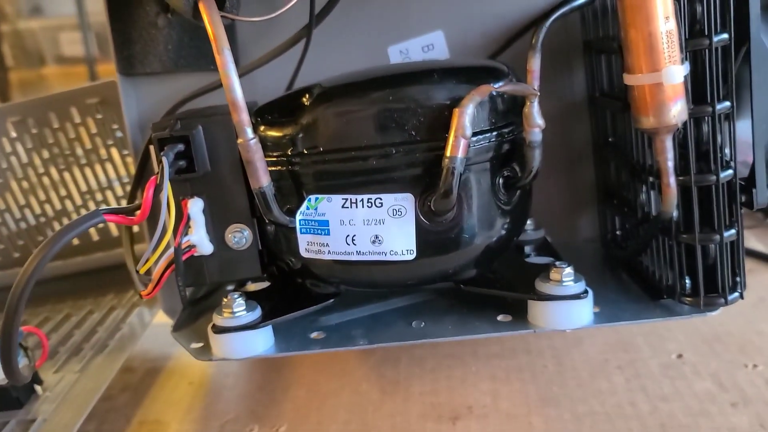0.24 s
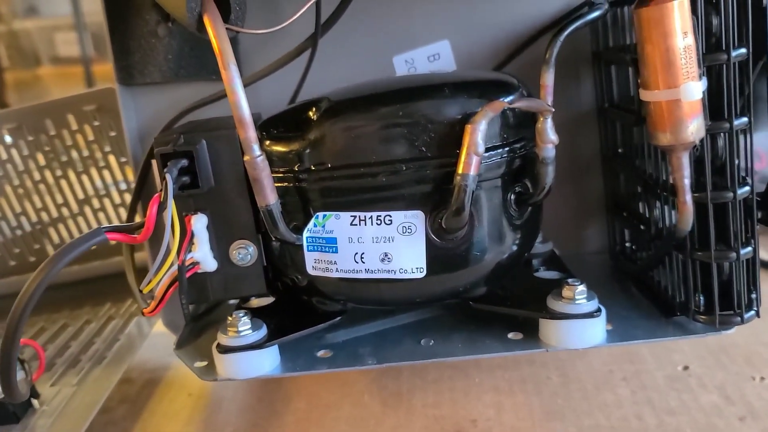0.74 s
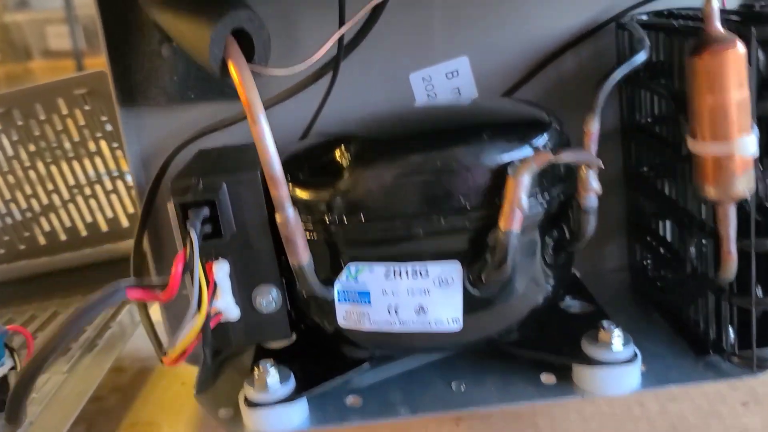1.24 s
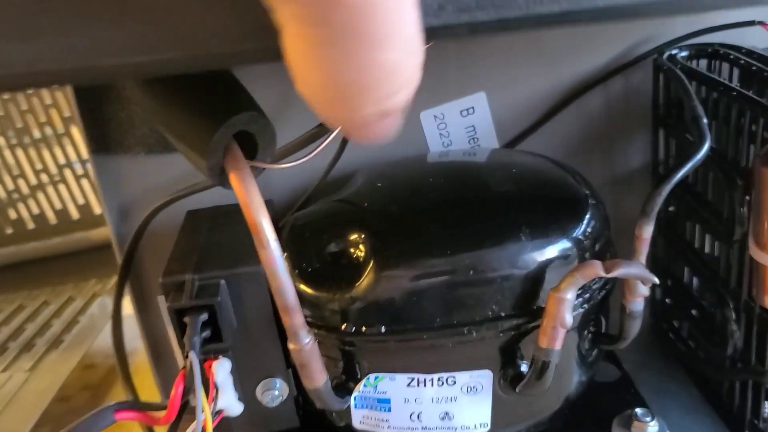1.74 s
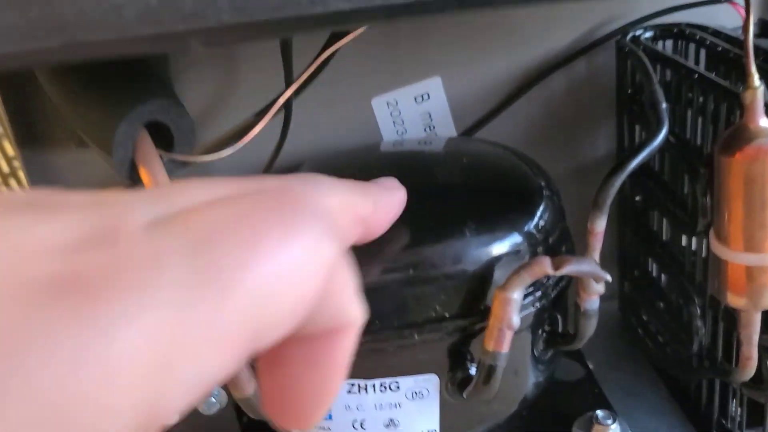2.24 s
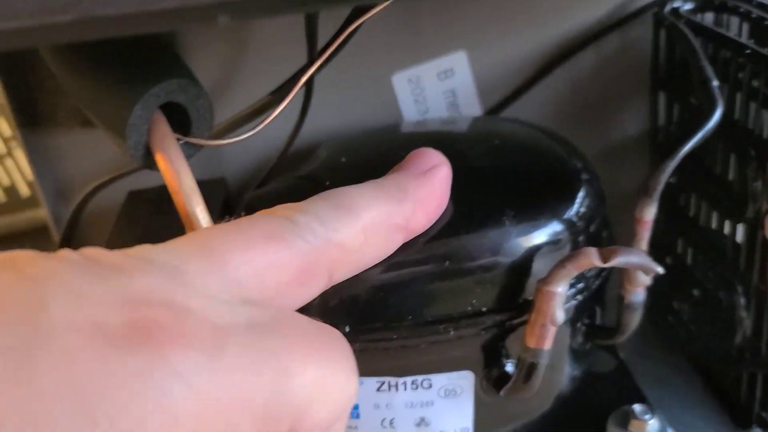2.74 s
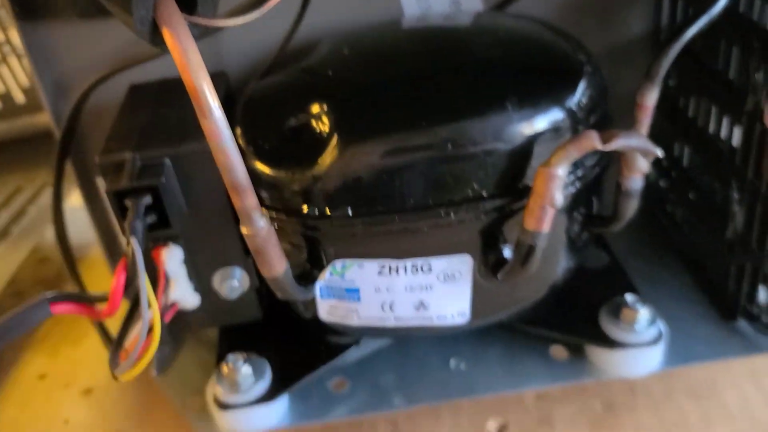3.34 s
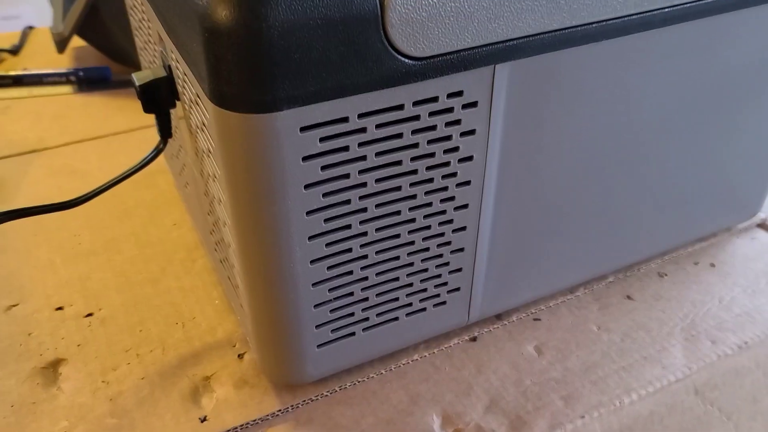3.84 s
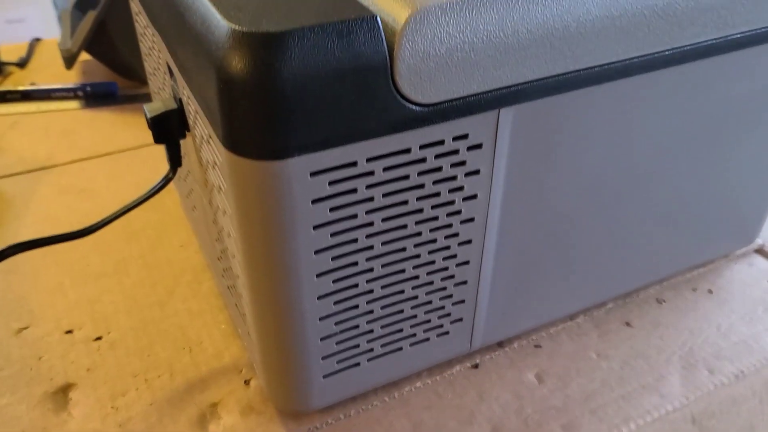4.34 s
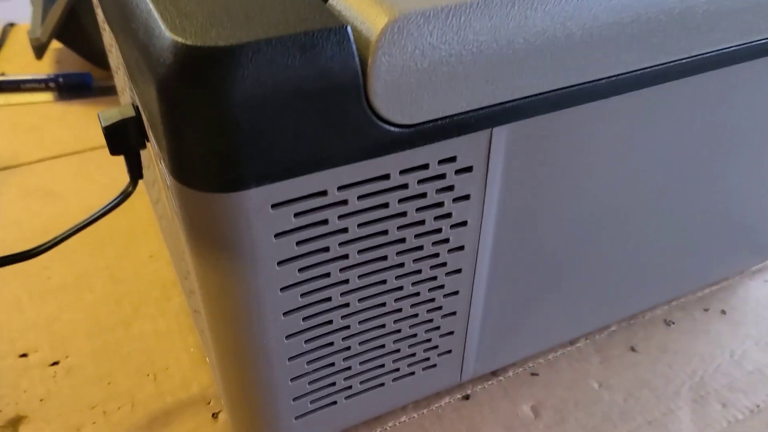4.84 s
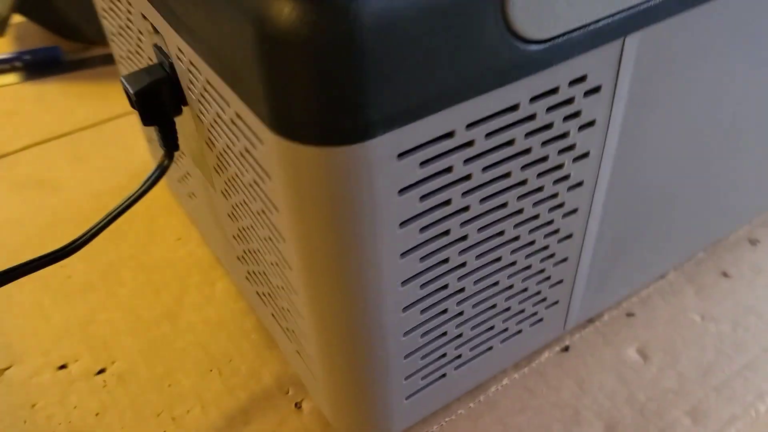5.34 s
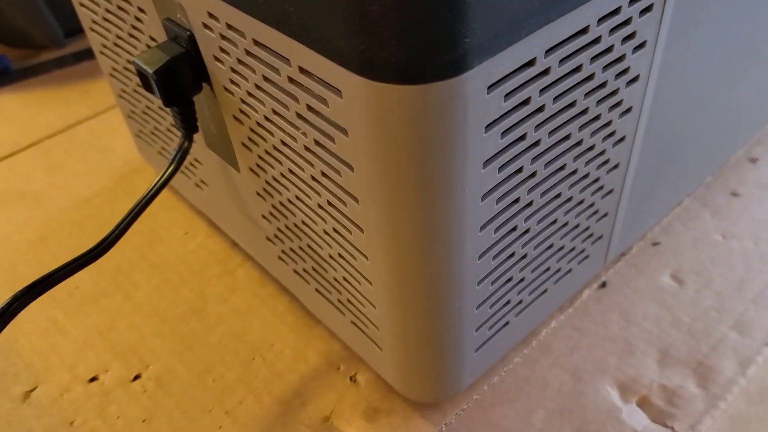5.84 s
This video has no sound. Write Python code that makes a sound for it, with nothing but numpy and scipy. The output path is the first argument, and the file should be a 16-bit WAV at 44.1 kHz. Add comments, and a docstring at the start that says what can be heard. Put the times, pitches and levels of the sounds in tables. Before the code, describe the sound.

A portable fridge compressor heard from close by: quiet uneven bumping grows into a quick rattle, a finger thumps the shell, and it steadies to a low buzzing hum with tiny chirps, pulsing gas hiss and faint high whine. A very short dropout follows, then a fuller, boomy drone from the closed case. Small rustles and clicks of handling come as the microphone nears the vents. No speech.

```python
"""A small piston compressor in a portable fridge, about 33 turns a second, heard from close by: motor
orders make its hum, modal impulses the rocking bumps until a finger knocks on the shell and steadies it.
After a brief dropout the same machine drones through the closed plastic case.
Valve reeds chirp as short sine bursts, the drive whines in sidebands, the gas is shaped noise puffed
once a turn, and handling is short swells of band noise."""
import sys
import numpy as np
from scipy import signal
from scipy.fft import rfft, irfft, next_fast_len
from scipy.io import wavfile
from scipy.ndimage import uniform_filter1d

SR = 44100
rng = np.random.default_rng(int(sys.argv[2]) if len(sys.argv) > 2 else 0)


def put_to_file(sound):
    """Save the sound as 16-bit audio at rate SR, in the file named by the first command-line argument."""
    columns = np.atleast_2d(sound).T  # one column per channel
    safe = np.clip(columns, -1, 1)
    whole_steps = np.round(safe * 32767)
    wavfile.write(sys.argv[1], SR, whole_steps.astype(np.int16))


N = 268833
TIME_S = np.arange(N) / SR
FFT_SIZE = next_fast_len(N, True)
BINS_HZ = np.fft.rfftfreq(FFT_SIZE, 1 / SR)

# Turning rate, and the time of one compression stroke
OPEN_TURNS_HZ, CLOSED_TURNS_HZ = 33.471, 33.543
OPEN_STROKE_S, CLOSED_STROKE_S = 2.8185, 4.3216
DROPOUT_FROM_S, DROPOUT_TO_S = 3.7165, 3.792

# Hum of the steadied shell. Each row: multiple of the turning rate, relative level in dB.
SHELL_HUM_ORDERS = [(1, -35.5), (2, -3.5), (3, -9), (4, -17.5), (5, 0.5), (6, -17), (7, -55), (8, -12.5),
                    (9, -26), (10, -25.5), (11, -25.5), (12, -31), (13, -28), (14, -36), (15, -30.5),
                    (16, -36.5), (17, -51), (18, -53)]
# Hum of the closed case. Each row: multiple of the turning rate, relative level in dB.
CASE_HUM_ORDERS = [(1, -47.5), (2, -2.5), (3, 0.5), (4, -26), (5, 3.5), (6, 2), (7, -8), (8, -14),
                   (9, -33.5), (10, -27), (11, -27), (12, -31.5), (13, -13.5), (14, -19), (15, -31),
                   (16, -54), (17, -46), (18, -37.5)]
# Motor whirr. Each row: multiple of the turning rate, relative level in dB.
WHIRR_ORDERS = [(19, -7), (21, -13.5), (22, -41.5), (23, 3), (24, -6.5), (25, -13.5)]
# Whine of the motor drive. Each row: sideband number, relative level in dB.
DRIVE_SIDEBANDS = [(-2, -10), (-1, -9), (0, 0), (1, -5.5), (2, -14)]
DRIVE_HZ = 10080
WHIRR_WAVER_DB, WHINE_WAVER_DB = 1.2, 1.8

# Modes of the shell on its mounts. Each row: frequency in Hz, relative level in dB, t60 in seconds,
# delay in seconds.
SHELL_MOUNT_MODES = [(83.4, -17, 0.22, 0.0112), (107.4, -5, 0.23, .014), (204.4, -1, 0.052, .003),
                     (260, -8.5, 0.037, 0.0013), (387.4, -12.5, 0.11, 0.006), (416, -13, 0.12, 0.0039),
                     (536, -28, 0.049, 0)]
# Last bump of the shaking shell, then the finger's blows. Each row: time in seconds, relative level in dB.
LANDING_BLOWS = [(1.7745, -27), (1.7905, -14.5), (1.8008, -14), (1.8112, -21)]
# Ring of the knock. Each row: frequency in Hz, relative level in dB, t60 in seconds, delay in seconds.
KNOCK_RING_MODES = [(54, -7, .2, .014), (192, -.5, .08, 0), (272, -8, .08, 0), (350, -8, .05, 0),
                    (554, -19, .03, 0)]
# Shell rebounding from the knock. Each row: time in seconds, relative level in dB, plate ring in dB.
SHELL_REBOUNDS = [(1.838, -22.5, -10), (1.895, -25, 2.5)]
# Bumps of one rock. Each row: seconds into the rock, relative level in dB, plate ring in dB.
BUMPS_PER_ROCK = [(0, 0, -2.5), (0.0614, -2, 3), (.0925, -8.5, 8.5)]
# The free shell rocks once in five turns; just before the finger lands it bumps on every stroke
ROCK_FROM_S, ROCK_S, SHAKE_FROM_S, SHAKE_TO_S = .0125, .1491, 1.564, 1.76
ROCK_DB, ROCK_GROWS_DB_PER_S, SHAKE_DB = -31.5, 4, -24.5
PLATE_FADES_DB_PER_S, SHAKE_PLATE_DB = -4, -2

# Gas and fan noise from further off. Each row: frequency in Hz, density in dB per Hz.
FAR_GAS_NOISE = [(25, -75.5), (110, -66.5), (220, -73.5), (420, -80.5), (620, -95.5), (800, -89),
                 (1050, -99), (1700, -105), (2400, -105), (3100, -96.5), (3700, -101), (4600, -98.5),
                 (11500, -103), (15500, -111)]
# Gas and fan noise near the shell. Each row: frequency in Hz, density in dB per Hz.
NEAR_GAS_NOISE = [(25, -66), (60, -82), (170, -61.5), (300, -73), (500, -80.5), (900, -84.5), (1300, -92.5),
                  (2300, -99.5), (4300, -93.5), (5500, -95.5), (10500, -96.5), (13000, -106), (15500, -109)]
# Gas and fan noise through the case. Each row: frequency in Hz, density in dB per Hz.
CASE_GAS_NOISE = [(25, -75.5), (100, -66.5), (200, -70), (300, -76), (450, -77.5), (700, -86.5),
                  (870, -95.5), (1050, -88.5), (2400, -95.5), (4600, -95.5), (5500, -101), (7300, -97.5),
                  (11500, -109), (15500, -111)]
# Handling rustle. Each row: peak time in seconds, rise in seconds, decay in seconds, level in dB,
# centre in Hz.
HAND_RUSTLES = [(1.345, 0.022, .013, -57.5, 4300), (1.9, 0.096, 0.15, -31.5, 48.3),
                (2.042, 0.0059, 0.02, -47.5, 2290), (2.106, 0.0093, 0.015, -43, 3770),
                (2.221, .003, .008, -48, 5000), (2.461, .003, .0066, -49.5, 5000),
                (3.11, .06, .044, -57.5, 4400), (3.68, 0.025, 0.016, -32.5, 50.4),
                (5.011, 0.012, 0.036, -45.5, 1660), (5.075, 0.021, .034, -57.5, 3780),
                (5.455, .022, 0.024, -52, 3340), (5.603, 0.0007, .004, -41.5, 5970),
                (5.738, 0.021, 0.02, -46.5, 4840), (5.86, 0.21, 0.066, -49.5, 4300),
                (6.08, .08, .082, -53, 3300)]
HISSY_RUSTLE_OCTAVES, DULL_RUSTLE_OCTAVES = 0.94, 0.67

# Listed hard valve chirps. Each row: time in seconds, relative level in dB.
LISTED_CHIRPS = [(0.489, -49), (0.638, -45.5), (0.787, -45.5), (1.6973, -38), (1.8444, -33), (2.0877, -36),
                 (2.1492, -37), (2.5676, -34), (2.7167, -37.5), (3.703, -29.5), (5.6122, -36)]
# Crank angles at which the two reeds open, and the chance that one flutters hard
REED_ANGLES_TURNS, HARD_CHANCE, HARD_FROM_S = (.62, .08), .42, 1.3
HARD_CHIRP_DB = (-55, -34)  # from afar, from close by
HARD_UNEVEN_DB, HARD_SCATTER_TURNS, SECOND_REED_DB = 1.5, .045, -1

# Microphone moving in on the bare shell. Each row: time in seconds, nearness 0 to 1.
SHELL_APPROACH = [(0, 0), (1.3, 0.16), (1.55, 0.5), (1.75, 0.72), (2.05, 0.92), (2.6, 0.88), (3.7, 0.98)]
# Microphone moving towards the vents of the closed case. Each row: time in seconds, nearness 0 to 1.
VENT_APPROACH = [(4.85, 0.1), (5.25, 0.56), (5.8, 1), (6.1, 0.7)]
# Uneven level of the open drive's whine. Each row: time in seconds, relative level in dB.
OPEN_WHINE_LEVEL = [(0.0, -69), (0.18, -73.5), (0.71, -67), (1.99, -65.5), (2.62, -69), (2.65, -77),
                    (2.83, -65), (3.08, -71.5), (3.7, -68)]
# Uneven level of the whine through the closed case. Each row: time in seconds, relative level in dB.
CLOSED_WHINE_LEVEL = [(3.82, -77), (4.094, -85), (5.68, -78)]
# Level of each part: (dB from afar, dB from close by)
SHELL_HUM_DB, SHELL_WHIRR_DB = (-60.5, -18), (-59.8, -53.3)
SHELL_VALVES_DB, SHELL_HISS_DB = (-70.5, -51.5), (-1, 0.5)
CASE_HUM_DB, CASE_WHIRR_DB = (-32, -30.5), (-62, -52)
CASE_VALVES_DB, CASE_HISS_DB, VENT_HUM_DB = (-59.5, -57), (0.1, 2), (-68, -45.5)
# Ceiling of the shell hum, and its brief dip after the knock
HELD_HUM_DB = -27.5
UPSET_AT_S, UPSET_S, UPSET_DB = 1.89, 0.054, -10

# Stereo width of diffuse noise. Each row: frequency in Hz, side minus mid in dB.
STEREO_WIDTH = [(60, -42), (110, -23), (200, -14), (380, -5), (700, -5), (1290, 0.5), (2380, 2),
                (4400, 1.5), (8120, 1), (15000, 0)]
# Stereo balance of diffuse noise. Each row: frequency in Hz, left minus right in dB.
STEREO_LEAN = [(60, 1.5), (110, -0.5), (200, 0.5), (380, 2), (700, 1.0), (1290, -0.5), (2380, -5.5),
               (4400, -4), (8120, 6), (15000, -3)]
# Microphone response. Each row: frequency in Hz, gain in dB.
MIC_RESPONSE = [(20, 1), (7600, 0.5), (7950, -9), (8900, -8), (10200, 2), (16000, -0.5)]
CUTOFF_HZ = 15800


def from_db(db):
    """Decibels to gain."""
    return 10 ** (np.asarray(db) / 20)


def rms_one(x):
    """Scale to unit power."""
    return x / np.sqrt(np.mean(x ** 2) + 1e-20)


def in_time(rows):
    """Join (s, value) rows by straight lines."""
    s, values = np.transpose(rows)
    return np.interp(TIME_S, s, values)


def gain_at(points, hz):
    """Gain of a (Hz, dB) table on a log-frequency axis."""
    f, db = np.transpose(points)
    return from_db(np.interp(np.log(np.maximum(hz, 1)), np.log(f), db))


def colour(x, gain):
    """Filter by a gain per frequency."""
    return irfft(rfft(x, FFT_SIZE) * gain, FFT_SIZE)[..., :N]


def resonance(hz, width_hz):
    """Complex gain per frequency of one resonance."""
    return 1 / (1 + 2j * (BINS_HZ - hz) / width_hz)


def drift(rate_hz):
    """Low-passed noise of unit power."""
    return rms_one(colour(rng.standard_normal(N), 1 / (1 + (BINS_HZ / rate_hz) ** 2)))


def white():
    """Mid and side noise of unit power per Hz."""
    return rng.standard_normal((2, N)) * np.sqrt(SR / 2)


def noise_band(noise, hz, octaves):
    """A bell-shaped band of noise; unit power."""
    distance = np.log2((BINS_HZ + 1) / hz) / octaves
    return rms_one(colour(noise, np.exp(-.5 * distance ** 2)))


def swell(s, rise_s, decay_s):
    """A rounded rise to a peak, then a dying tail."""
    before = np.minimum(TIME_S - s, 0) / rise_s
    after = np.maximum(TIME_S - s, 0) / decay_s
    return np.exp(-before ** 2 - np.minimum(after, 20))


def spread(mid, side):
    """Two microphones: alike in the bass, unrelated in the treble."""
    side = colour(side, gain_at(STEREO_WIDTH, BINS_HZ))
    half_lean = np.array([[.5], [-.5]])
    return colour(np.array([mid + side, mid - side]), gain_at(STEREO_LEAN, BINS_HZ) ** half_lean)


def place(x, pan_db, lag_ms):
    """A compact source: left louder by pan_db, right later by lag_ms."""
    left = np.interp(TIME_S + lag_ms / 1000, TIME_S, x)
    return np.array([left * from_db(pan_db / 2), x * from_db(-pan_db / 2)])


def nearness(path):
    """How close the microphone is, 0 to 1."""
    return np.clip(in_time(path), 0, 1)


def heard_at(near, levels_db):
    """Level of a part between its far and its close value."""
    far_db, close_db = levels_db
    return far_db + near * (close_db - far_db)


def crank(turns_hz, stroke_s, wander_turns):
    """Turns of the crank; whole numbers are compression strokes."""
    return turns_hz * (TIME_S - stroke_s) + wander_turns * drift(8.1)


def once_a_turn(turns, at, width):
    """A smooth bump at one crank angle."""
    return np.exp(-.5 * (((turns - at + .5) % 1 - .5) / width) ** 2)


def ring(clicks, hz, t60_s):
    """A unit click sets a decaying sine ringing through a two-pole resonator."""
    r = from_db(-60 / (t60_s * SR))
    w = 2 * np.pi * hz / SR
    return signal.lfilter([0, np.sin(w)], [1, -2 * r * np.cos(w), r * r], clicks + 1e-18)


def strike(times_s, levels_db, mode):
    """Blows ring one mode after that mode's delay."""
    hz, db, t60_s, delay_s = mode
    clicks = np.zeros(N)
    at = np.clip((times_s + delay_s) * SR, 0, N - 1).astype(int)
    clicks[at] = from_db(levels_db + db)
    return ring(clicks, hz, t60_s)


def low_pass(x, hz):
    """Second-order low-pass."""
    return signal.sosfilt(signal.butter(2, hz, fs=SR, output="sos"), x)


def rustles(grain_db):
    """Skin and cloth brush past and the hand shifts its grip: swells of grainy noise, hissy or dull."""
    out, noise = 0, rng.standard_normal((2, N))
    for s, rise_s, decay_s, db, hz in HAND_RUSTLES:
        octaves = HISSY_RUSTLE_OCTAVES if hz > 300 else DULL_RUSTLE_OCTAVES
        out = out + from_db(db) * swell(s, rise_s, decay_s) * noise_band(noise, hz, octaves)
    return out * from_db(grain_db * drift(251))


def slap(level_db, centre_hz, octaves, rise_s, decay_s):
    """The skin of the fingertip slaps the shell at the hardest blow: a swell of band noise."""
    s, _ = max(LANDING_BLOWS, key=lambda row: row[1])
    noise = noise_band(rng.standard_normal((2, N)), centre_hz, octaves)
    return from_db(level_db) * swell(s, rise_s, decay_s) * noise


def case_gas(turns):
    """Gas noise through the case: a steady flow and a puff at every stroke (mid, side)."""
    density = gain_at(CASE_GAS_NOISE, BINS_HZ)
    puff_tilt = gain_at([(250, 5.5), (500, 2.5), (1500, -0.5), (4600, 1.0), (7000, -2)], BINS_HZ)
    puff = colour(white() * once_a_turn(turns, at=0.033, width=0.068), density * puff_tilt)
    steady = colour(white(), density) * from_db(-2.5)
    return steady + puff


def shell_gas(turns, near):
    """Gas noise of the bare shell: far flow, and near flow with puffs (each mid, side)."""
    density = gain_at(NEAR_GAS_NOISE, BINS_HZ)
    # gas rushes out with every stroke, mostly in the middle of the range
    puff_tilt = gain_at([(250, -8), (500, 5.5), (1500, 9.5), (5000, 4.0), (10000, 0.0)], BINS_HZ)
    puff = colour(white() * once_a_turn(turns, at=0.049, width=0.082), density * puff_tilt)
    # the flow keeps the reeds' resonance sounding
    steady = colour(white(), density * (1 + 4.7 * resonance(3030, 240))) * from_db(-1.5)
    # the pipes ring faintly in the flow
    pipes = 1 + 2.0 * resonance(6350, 80) + 0.44 * resonance(4700, 340)
    far = colour(white(), gain_at(FAR_GAS_NOISE, BINS_HZ) * pipes)
    return far * np.sqrt(1 - near ** 2), near * (steady + puff)


def whine(turns):
    """The drive's switching tone, with sidebands from ten commutations a turn."""
    out = 0
    for k, db in DRIVE_SIDEBANDS:
        phase_turns = DRIVE_HZ * TIME_S + 10 * k * turns + rng.random()
        level = from_db(db + WHINE_WAVER_DB * drift(11.0))
        out = out + level * np.sqrt(2) * np.sin(2 * np.pi * phase_turns)
    return out


def whirr(turns):
    """High motor orders, each wavering a little; unit power."""
    out = 0
    for k, db in WHIRR_ORDERS:
        level = from_db(db + WHIRR_WAVER_DB * drift(9.2))
        out = out + level * np.sin(2 * np.pi * (k * turns + rng.random()))
    return rms_one(out)


def valves(turns, angles, reed_hz, length_turns, scatter_turns, uneven_db, second_db, rough):
    """Suction and discharge reeds each flutter briefly once a turn, never quite alike; unit power."""
    out = 0
    gas = rms_one(colour(rng.standard_normal(N), np.abs(resonance(reed_hz, 420)) ** 2))
    for angle, db in zip(angles, (0, second_db)):
        since = turns - angle + .5
        turn = (np.floor(since) - np.floor(since.min())).astype(int)
        chance = np.clip(rng.standard_normal((turn.max() + 1, 2)), -1.6, 1.6)
        late, size = chance[turn].T
        age_turns = since % 1 - .5 - scatter_turns * late
        flutter = np.sin(2 * np.pi * reed_hz * age_turns / OPEN_TURNS_HZ) + rough * gas
        envelope = np.exp(-.5 * (age_turns / length_turns) ** 2)
        out = out + from_db(db + uneven_db * size) * envelope * flutter
    return rms_one(out)


def chirp_rows(listed_db):
    """From 1.3 s until the dropout, some reed openings flutter hard and join the listed ones: (s, dB)."""
    first = -int(OPEN_STROKE_S * OPEN_TURNS_HZ)
    last = int((DROPOUT_FROM_S - OPEN_STROKE_S) * OPEN_TURNS_HZ)
    strokes = np.arange(first, last)
    angles = np.add.outer(strokes, REED_ANGLES_TURNS).ravel()
    late, size = rng.standard_normal((len(angles), 2)).T
    s = OPEN_STROKE_S + (angles + HARD_SCATTER_TURNS * late) / OPEN_TURNS_HZ
    near = np.interp(s, TIME_S, nearness(SHELL_APPROACH))
    db = heard_at(near, HARD_CHIRP_DB) + HARD_UNEVEN_DB * size
    db = db + np.tile([0, SECOND_REED_DB], len(strokes))
    hard = (rng.random(len(s)) < HARD_CHANCE) & (s > HARD_FROM_S)
    return [(at, level + listed_db) for at, level in LISTED_CHIRPS] + list(zip(s[hard], db[hard]))


def sharp_chirps(rows, reed_hz, length_s, rough):
    """A reed flutters much harder for a few milliseconds: a sine in a bell-shaped envelope."""
    out, age_s = np.zeros(N), np.arange(-400, 400) / SR
    half = len(age_s) // 2
    envelope = np.exp(-.5 * (age_s / length_s) ** 2)
    for (s, db), (detune, start) in zip(rows, rng.standard_normal((len(rows), 2))):
        at = int((s + length_s) * SR)
        hz = reed_hz * (1 + 0.012 * detune)
        out[at - half:at + half] += from_db(db) * envelope * np.sin(2 * np.pi * (hz * age_s + start))
    return out * (1 + rough * drift(400))


def bump_rows():
    """Bumps of each growing rock, then one every stroke, then the rebounds: (s, dB, plate dB)."""
    rocking = []
    for start in np.arange(ROCK_FROM_S, SHAKE_FROM_S, ROCK_S):
        for s, db, plate_db in BUMPS_PER_ROCK:
            if start + s < SHAKE_FROM_S:
                level_db = ROCK_DB + ROCK_GROWS_DB_PER_S * start + db
                rocking.append((start + s, level_db, plate_db + PLATE_FADES_DB_PER_S * start))
    shake_times = np.arange(SHAKE_FROM_S, SHAKE_TO_S, 1 / OPEN_TURNS_HZ)
    shaking = [(s, SHAKE_DB, SHAKE_PLATE_DB) for s in shake_times]
    return rocking + shaking + SHELL_REBOUNDS


def bumps(uneven_db, plate_share, level_db):
    """The rocking shell bumps on its rubber feet; the thin base plate rings above the low thud."""
    s, db, plate_db = np.transpose(bump_rows())
    plate_db = plate_share * (plate_db - plate_db.mean())
    out = 0
    for k, mode in enumerate(SHELL_MOUNT_MODES):
        is_plate = mode[0] > 300
        mode_db = db + level_db + is_plate * plate_db + uneven_db * rng.standard_normal(len(s))
        out = out + (-1) ** k * strike(s, mode_db, mode)
    return out


def bounces(first_hz, last_hz, relax_s, rise_s, decay_s, level_db):
    """Squeezed rubber is stiff and softens as it lets go, so each bump falls in pitch."""
    s, db, _ = np.transpose(bump_rows())
    age_s = np.arange(SR // 5) / SR
    hz = last_hz + (first_hz - last_hz) * np.exp(-age_s / relax_s)
    envelope = (1 - np.exp(-age_s / rise_s)) * np.exp(-age_s / decay_s)
    bounce = -np.sin(2 * np.pi * np.cumsum(hz) / SR) * envelope
    clicks = np.zeros(N)
    clicks[(s * SR).astype(int)] = from_db(db + level_db)
    return signal.fftconvolve(clicks, bounce)[:N]


def knock():
    """After a last bump, a soft fingertip pushes the shell against its stops: low-passed ringing modes."""
    s, db = np.transpose(LANDING_BLOWS)
    return low_pass(-sum(strike(s, db, mode) for mode in KNOCK_RING_MODES), 560)


def hum(turns, orders, lateness_turns, linger, rough):
    """Each stroke pulls the body in; linger 0 is an even pulse, 1 a kick with its ring behind it."""
    multiples, db = np.transpose(orders)
    log_gain = np.log(from_db(np.interp(np.arange(129), multiples, db)))
    # minimum phase from the mirrored log gain
    mirrored = np.concatenate([log_gain, log_gain[-2:0:-1]])
    phase = -linger * np.imag(signal.hilbert(mirrored))
    out = 0
    for k, level_db in orders:
        out = out + from_db(level_db) * np.cos(2 * np.pi * k * (turns - lateness_turns) + phase[k])
    return -rms_one(out) * (1 + rough * drift(26))


def vent_hum(turns):
    """The ninth to eleventh orders, stronger near the vents; unit power."""
    orders = [(9, 0), (10, -7), (11, -6)]
    return rms_one(sum(from_db(db) * np.cos(2 * np.pi * k * turns) for k, db in orders))


def closed_case():
    """The case booms with each stroke and muffles the treble: compact (left, right), diffuse (mid, side)."""
    turns = crank(CLOSED_TURNS_HZ, CLOSED_STROKE_S, wander_turns=0.0011)
    near = nearness(VENT_APPROACH)
    hiss_db = heard_at(near, CASE_HISS_DB)
    body = from_db(heard_at(near, CASE_HUM_DB)) * hum(
        turns, CASE_HUM_ORDERS, lateness_turns=.045, linger=.5, rough=.025)
    body += from_db(heard_at(near, VENT_HUM_DB)) * vent_hum(turns)
    chirps = from_db(heard_at(near, CASE_VALVES_DB)) * valves(
        turns, (.38, .9), reed_hz=3130, length_turns=.1, scatter_turns=.06,
        uneven_db=2.6, second_db=-4, rough=1.3)
    chatter = from_db(-66.5 + hiss_db) * valves(
        turns, (.98, .84), reed_hz=4570, length_turns=0.082, scatter_turns=.025,
        uneven_db=3.0, second_db=1.0, rough=1.5)
    motor = from_db(heard_at(near, CASE_WHIRR_DB)) * whirr(turns)
    drive = from_db(in_time(CLOSED_WHINE_LEVEL) + 2.5) * whine(turns)
    compact = place(body, pan_db=-0.1, lag_ms=-0.26)
    compact += place(chirps, pan_db=3.0, lag_ms=0.053)
    compact += place(chatter, pan_db=-9.0, lag_ms=0.062)
    compact += place(motor, pan_db=3.0, lag_ms=0.22)
    compact += place(drive, pan_db=-17.0, lag_ms=0.016)
    return compact, case_gas(turns) * from_db(hiss_db)


def open_housing():
    """The bare compressor hums, bumps and chirps: compact (left, right), diffuse (mid, side)."""
    turns = crank(OPEN_TURNS_HZ, OPEN_STROKE_S, wander_turns=0.0018)
    near = nearness(SHELL_APPROACH)
    upset_db = UPSET_DB * np.exp(-((TIME_S - UPSET_AT_S) / UPSET_S) ** 2)
    hum_db = np.minimum(heard_at(near, SHELL_HUM_DB), HELD_HUM_DB) + upset_db
    shell = hum(turns, SHELL_HUM_ORDERS, lateness_turns=-.125, linger=.7, rough=.03)
    thuds = low_pass(bumps(uneven_db=2.46, plate_share=0.71, level_db=1.0), 620)
    thuds += bounces(first_hz=252.9, last_hz=78, relax_s=0.0262, rise_s=0.0032, decay_s=0.017, level_db=2.5)
    body = from_db(hum_db) * shell + thuds + knock()
    reeds = from_db(heard_at(near, SHELL_VALVES_DB)) * valves(
        turns, (.62, .1), reed_hz=3110, length_turns=.05, scatter_turns=.065,
        uneven_db=1.8, second_db=-1, rough=.6)
    motor = from_db(heard_at(near, SHELL_WHIRR_DB)) * whirr(turns)
    drive = from_db(in_time(OPEN_WHINE_LEVEL) + 1.0) * whine(turns)
    compact = place(body, pan_db=1.0, lag_ms=-0.15)
    compact += place(reeds, pan_db=2.5, lag_ms=0.039)
    compact += place(motor, pan_db=-0.2, lag_ms=0.22)
    compact += place(drive, pan_db=-11.0, lag_ms=0.012)
    far_gas, near_gas = shell_gas(turns, near)
    return compact, far_gas * from_db(heard_at(near, SHELL_HISS_DB)) + near_gas


def scene():
    """First the open housing, then the closed case, with hard chirps and the hand on top."""
    is_open = TIME_S < (DROPOUT_FROM_S + DROPOUT_TO_S) / 2
    compact, diffuse = np.where(is_open, open_housing(), closed_case())
    chirps = sharp_chirps(chirp_rows(listed_db=1.5), reed_hz=3112, length_s=.00115, rough=0.16)
    hand = rustles(grain_db=2.5)
    hand = hand + slap(level_db=-46, centre_hz=300, octaves=3.0, rise_s=0.014, decay_s=0.013)
    return compact + place(chirps, pan_db=-1.0, lag_ms=0.045) + spread(*(diffuse + hand))


def record(dry):
    """Microphone colour, the brief dropout, and a steep top cut."""
    heard = colour(dry, gain_at(MIC_RESPONSE, BINS_HZ))
    in_dropout = (TIME_S > DROPOUT_FROM_S) & (TIME_S < DROPOUT_TO_S)
    heard = heard * uniform_filter1d(np.where(in_dropout, from_db(-38), 1), size=24)
    return signal.sosfilt(signal.ellip(12, .1, 90, CUTOFF_HZ, fs=SR, output="sos"), heard)


dry = scene()
out = record(dry)
put_to_file(out)
```